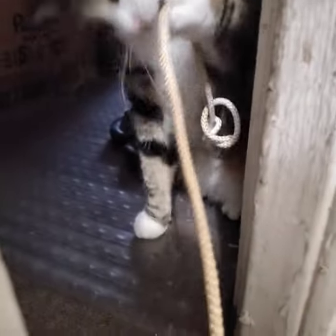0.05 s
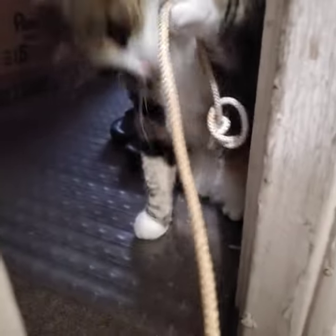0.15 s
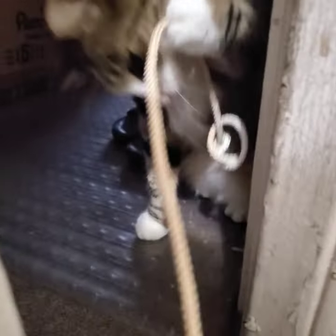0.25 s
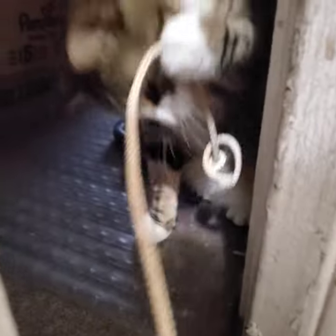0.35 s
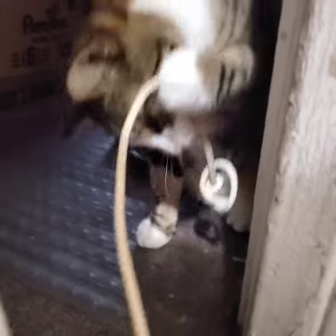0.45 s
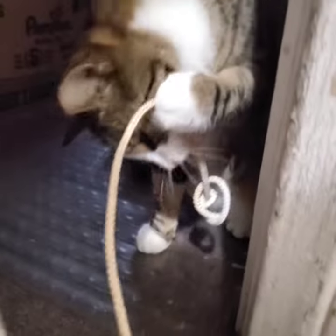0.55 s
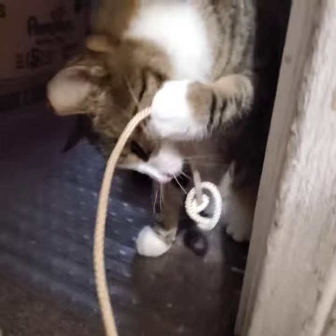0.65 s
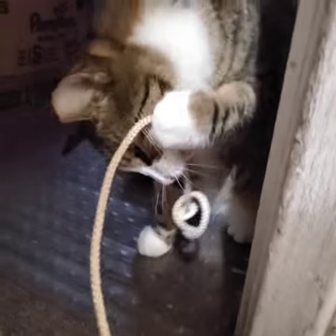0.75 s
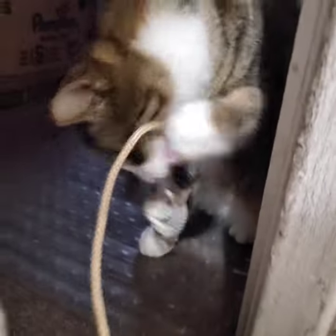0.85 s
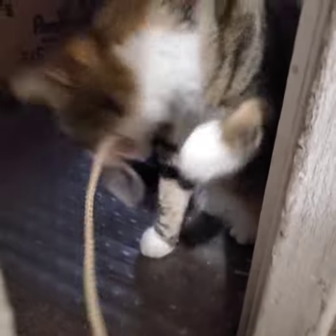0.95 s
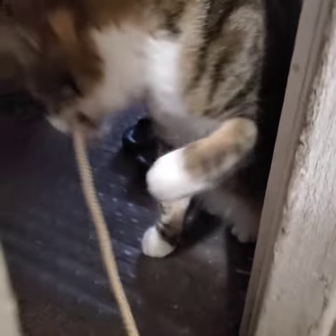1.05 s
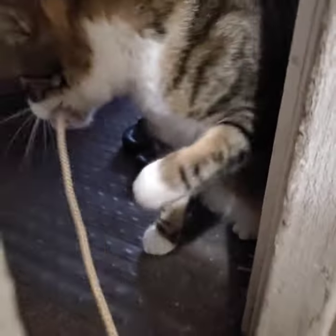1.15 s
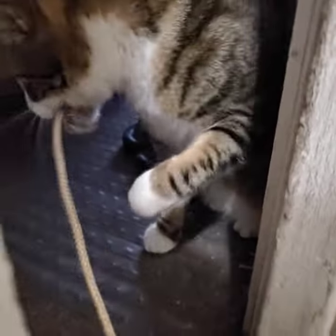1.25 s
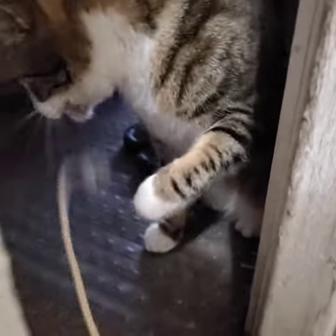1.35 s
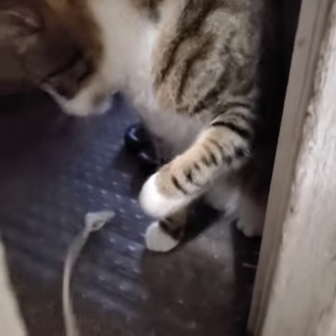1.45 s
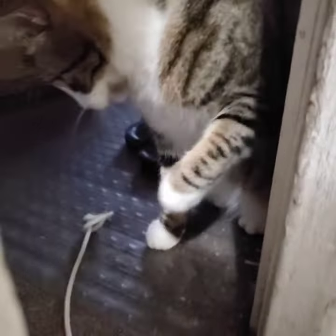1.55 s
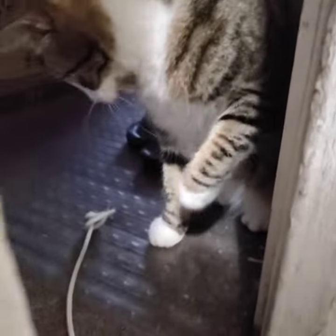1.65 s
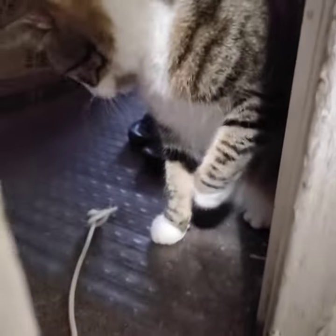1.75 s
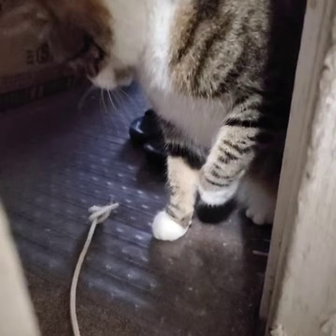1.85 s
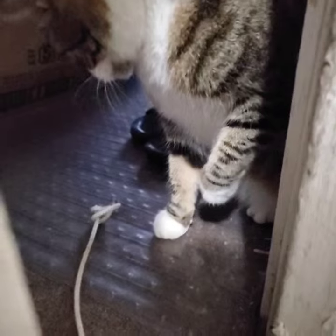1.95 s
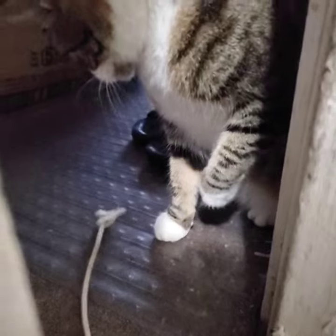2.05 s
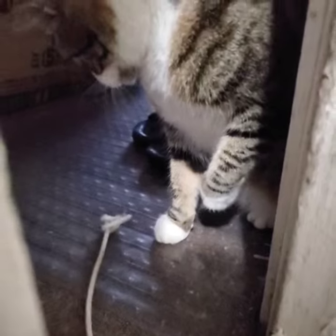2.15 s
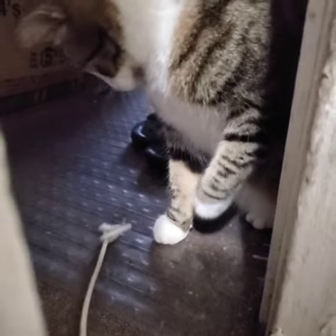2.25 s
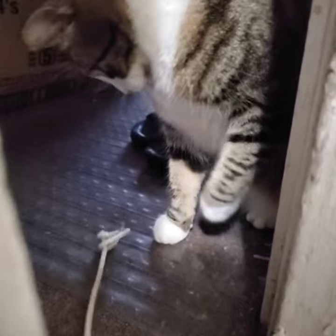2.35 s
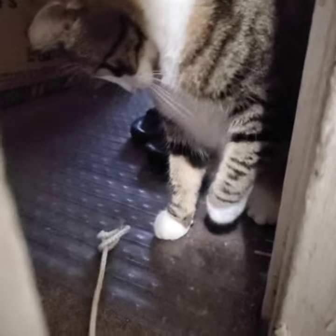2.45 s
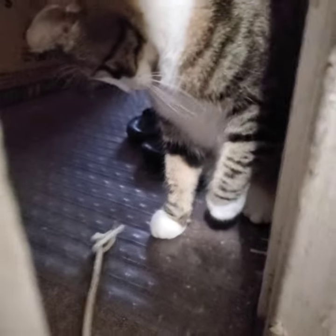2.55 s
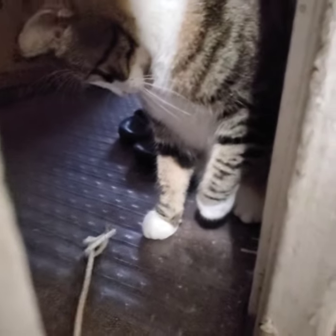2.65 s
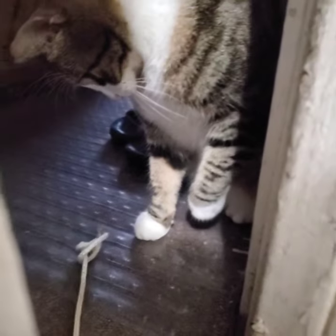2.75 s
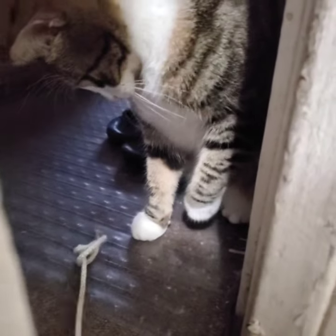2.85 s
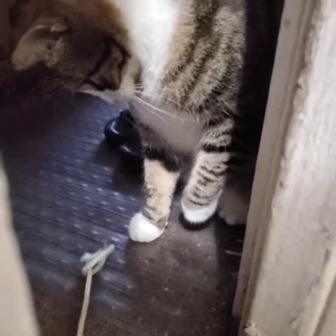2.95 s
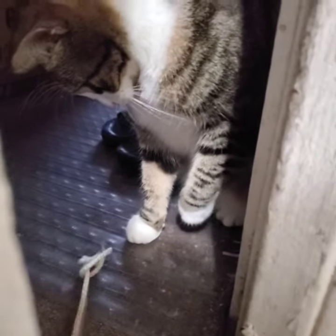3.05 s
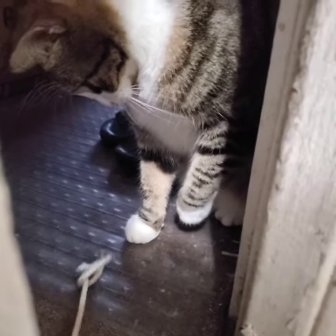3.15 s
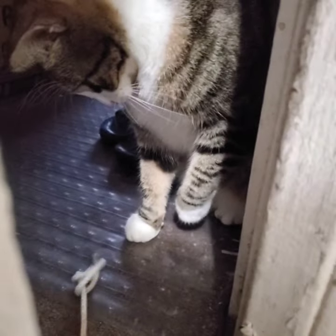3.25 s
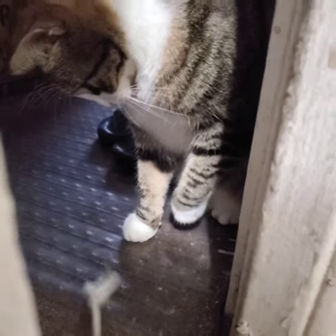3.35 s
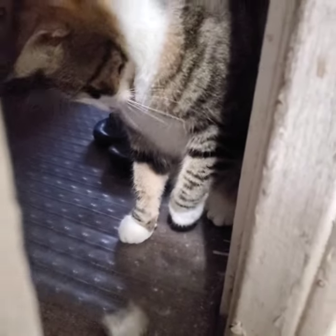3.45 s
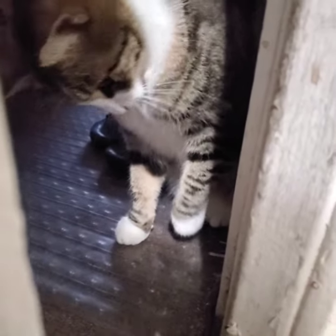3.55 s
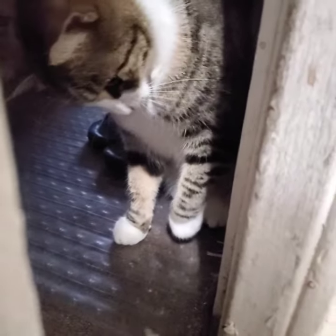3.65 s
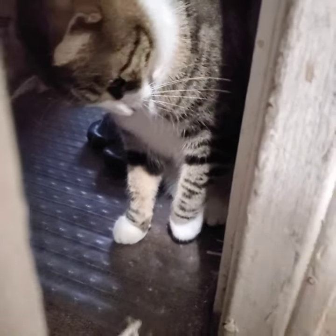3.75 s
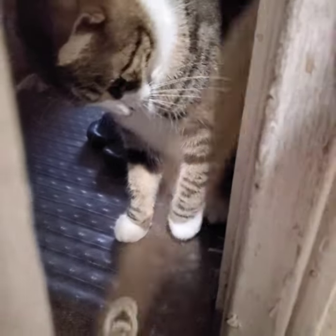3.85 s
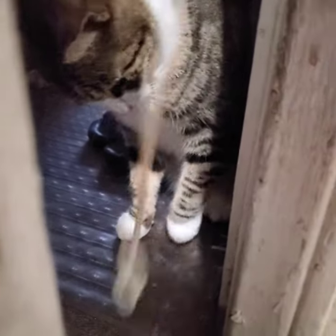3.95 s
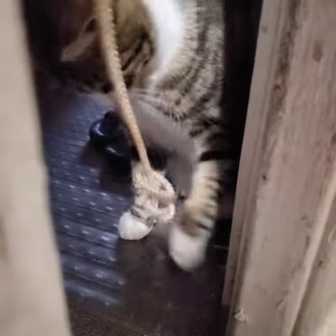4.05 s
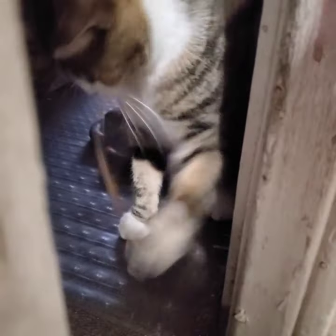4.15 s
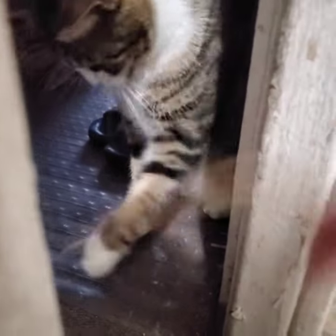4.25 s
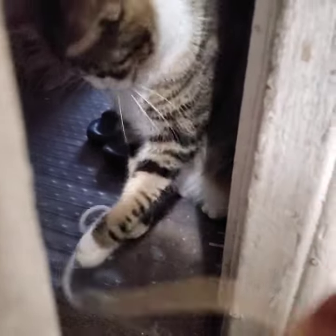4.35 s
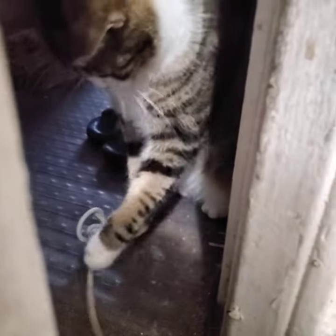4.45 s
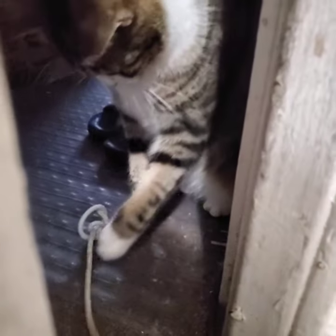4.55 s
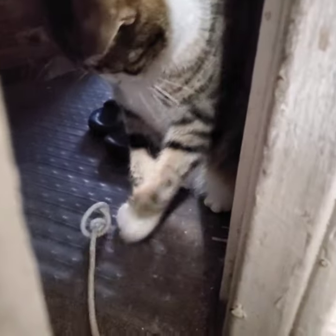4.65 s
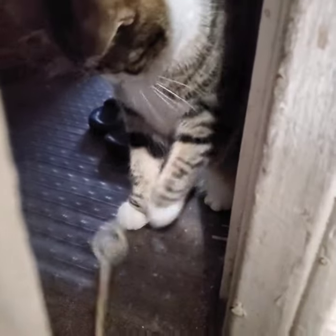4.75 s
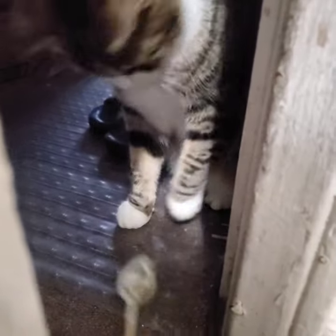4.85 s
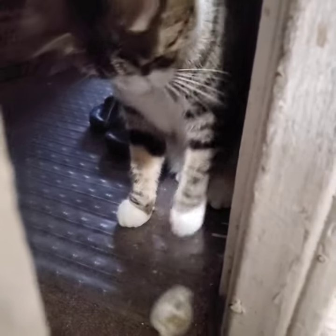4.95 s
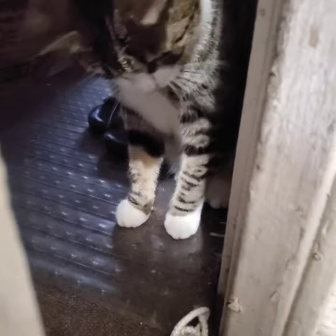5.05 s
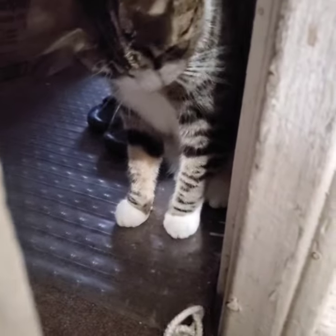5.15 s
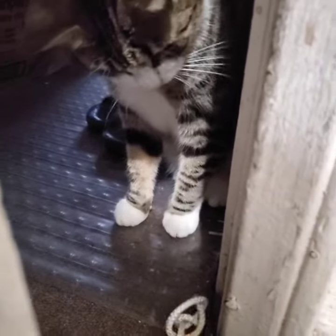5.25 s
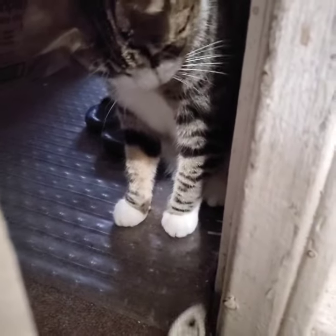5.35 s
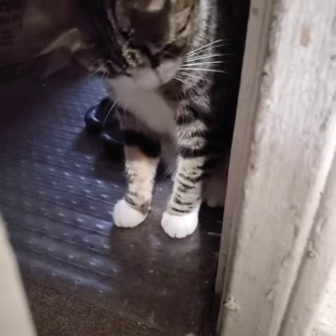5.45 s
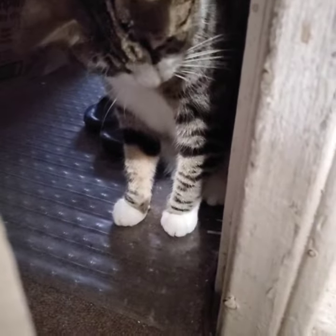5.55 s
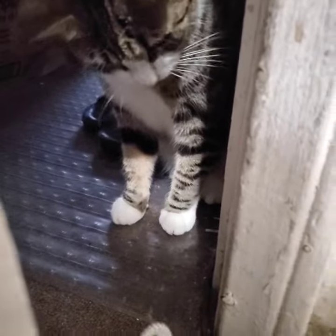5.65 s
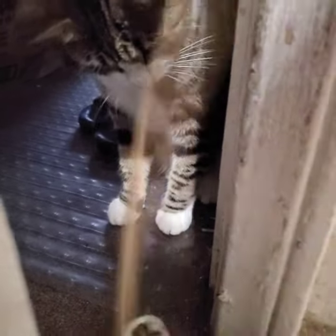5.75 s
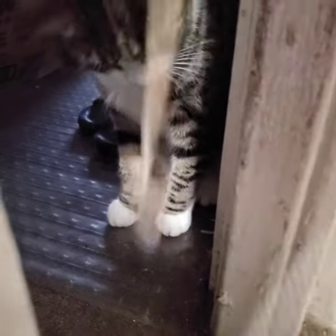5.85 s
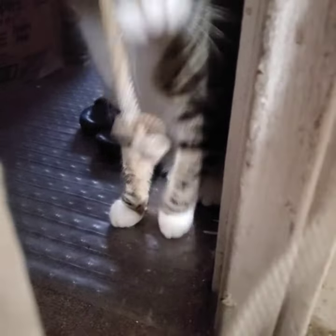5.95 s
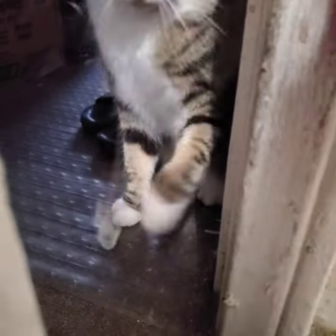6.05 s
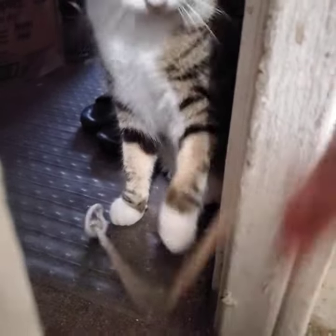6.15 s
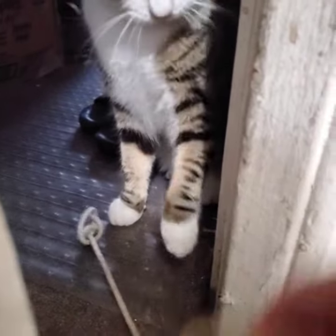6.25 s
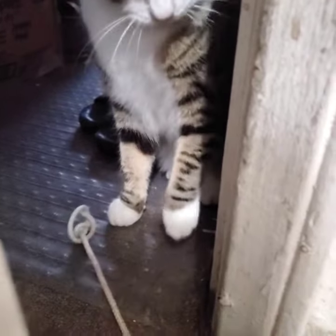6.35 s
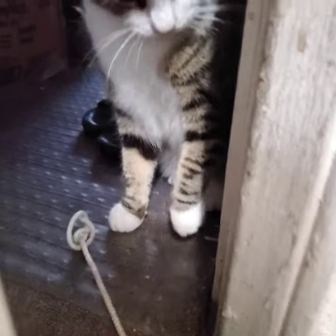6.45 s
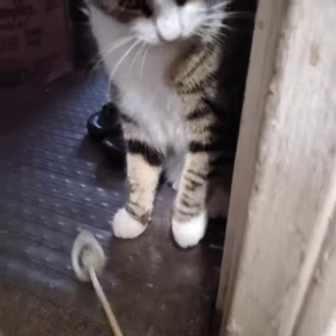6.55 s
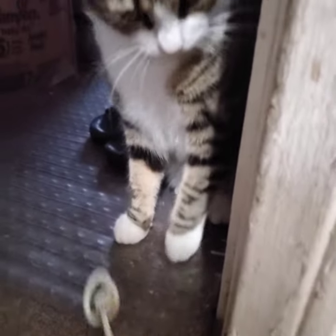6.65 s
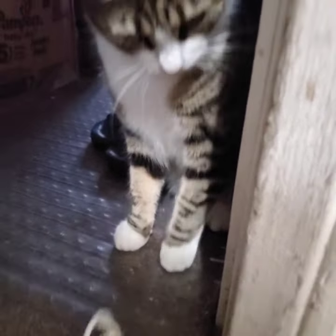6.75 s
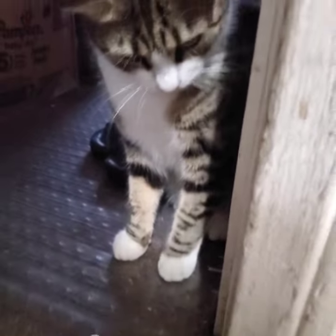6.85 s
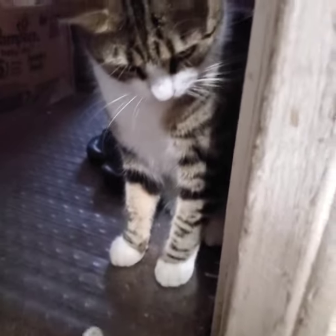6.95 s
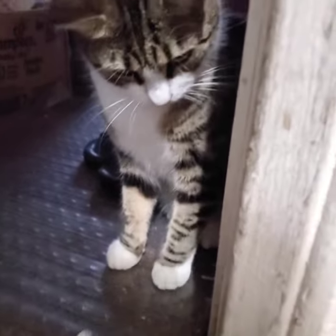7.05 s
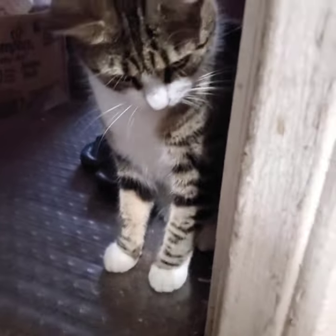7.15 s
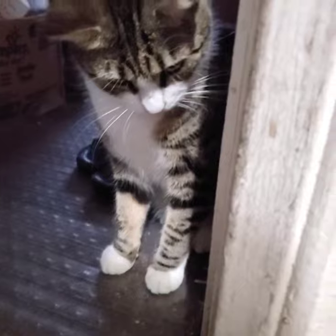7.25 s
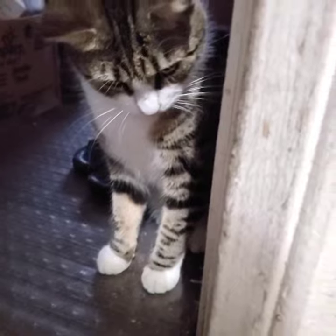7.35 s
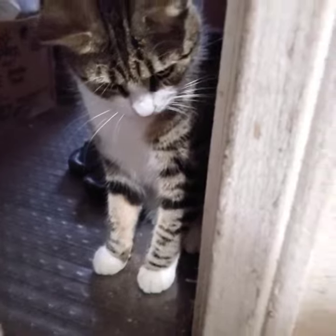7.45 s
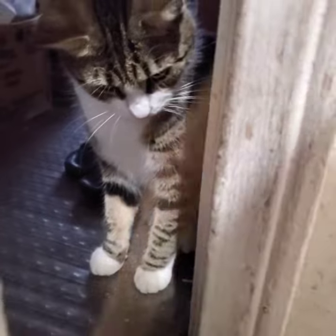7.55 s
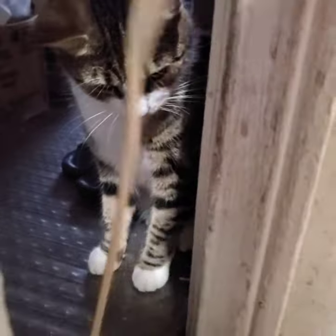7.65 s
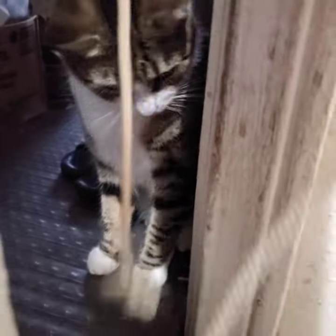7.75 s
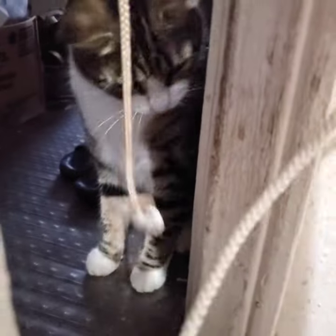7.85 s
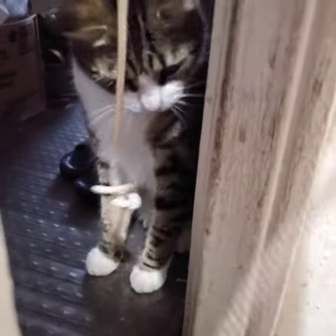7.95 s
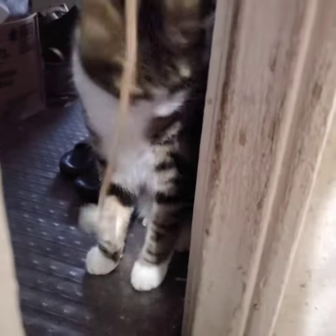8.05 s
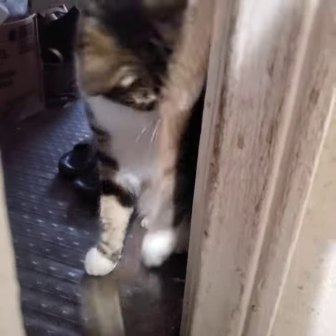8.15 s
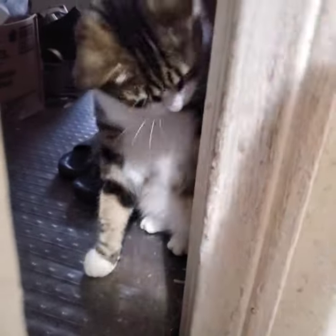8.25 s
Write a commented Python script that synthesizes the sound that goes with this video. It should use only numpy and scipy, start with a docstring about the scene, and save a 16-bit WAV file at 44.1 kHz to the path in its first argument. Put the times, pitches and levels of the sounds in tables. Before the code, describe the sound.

In a small room with a faint low rumble and hum, a cat pads softly, then a knotted cord knocks sharply on the floor. A sleeve right beside the microphone, a little to the right, starts rustling in scratchy bursts with bright little snags and a few dull bumps. The cord swishes briefly as it is swung, and two more sharp knocks land between the rustles before the cloth settles.

```python
"""A doorway in a small room, where a cat plays with a knotted cord that is swung for it.
Under everything lies a faint bed of building rumble and mains hum. There is soft brushing; paws
pad, the knot knocks and sets the floor ringing, and the cord swishes in short bands of hiss.
Right beside the microphone a sleeve rustles with countless slipping fibres, snags in bright
little sprays and now and then rubs dully or bumps the case."""
import sys
import numpy as np
from scipy import signal
from scipy.fft import rfft, irfft, next_fast_len
from scipy.io import wavfile

SR = 44100
rng = np.random.default_rng(int(sys.argv[2]) if len(sys.argv) > 2 else 0)


def transcribe(u):
    """Save the signal u as a 16-bit wav file named by the first command-line argument.

    u: samples, shape (n,) or (channels, n), limited to [-1, 1]; the rate is SR.
    q: integer samples, one column per channel.
    """
    v = np.clip(np.atleast_2d(u).T, -1, 1)
    q = np.round(v * 32767).astype(np.int16)
    wavfile.write(sys.argv[1], SR, q)


N = 365588


def from_db(db):
    """Decibels to gain."""
    return 10 ** (np.asarray(db) / 20)


def rms_one(x):
    """Scale to rms 1."""
    return x / np.sqrt(np.mean(x ** 2) + 1e-20)


def at_hz(points, hz):
    """Read a curve on a log-frequency axis."""
    known_hz, values = np.transpose(points)
    return np.interp(np.log(np.maximum(hz, 1)), np.log(known_hz), values)


def panned(pan_db):
    """Constant-power pan; pan_db is left minus right."""
    gains = from_db(np.array([[.5], [-.5]]) * pan_db)
    return gains / np.sqrt(np.mean(gains ** 2, axis=0))


def filtered(x, hz, kind, order=1):
    """Butterworth filter."""
    edges = np.clip(hz, 10, .45 * SR)
    return signal.sosfilt(signal.butter(order, edges, kind, fs=SR, output="sos"), x)


def add(out, time, sound):
    """Mix a short stereo sound in at a time in seconds."""
    start = round(time * SR)
    out[:, start:start + sound.shape[1]] += sound[:, :N - start]


def drift(rate_hz, hop=80, points=8192):
    """Smooth random modulation with an rms of about 1."""
    hz = np.fft.rfftfreq(points, hop / SR)
    slow = rms_one(irfft(rfft(rng.standard_normal(points)) / (1 + (hz / rate_hz) ** 2)))
    return np.interp(np.arange(N) / hop, np.arange(points), slow)


def stereo(sources, eq, likeness, pan=None, left_lag_s=0):
    """Spread and EQ three unrelated signals: one feeds both sides, the others one side each."""
    size = next_fast_len(N, True)
    hz = np.fft.rfftfreq(size, 1 / SR)
    parts = rfft(sources, size)
    alike = np.clip(at_hz(likeness, hz), 0, 1)
    shared = parts[0] * np.exp(-2j * np.pi * hz * np.array([[left_lag_s], [0]]))
    sides = np.sqrt(alike) * shared + np.sqrt(1 - alike) * parts[1:]
    balance = panned(at_hz(pan, hz)) if pan else 1
    return rms_one(irfft(sides * balance * from_db(at_hz(eq, hz)), size)[:, :N])


# tone of the building's rumble: (frequency [Hz], level [dB])
RUMBLE_EQ = [(20, -63), (27, -28), (36, -7.5), (58, -3), (90, -1.5), (125, -9.5), (170, -17.5),
             (250, -24.5), (520, -32), (900, -44.5), (2000, -46.5), (4000, -51), (7000, -55),
             (16000, -55.5)]
# its stereo image, mono in the lows and wide above: (frequency [Hz], left-right likeness [0-1])
RUMBLE_IMAGE = [(60, 1), (200, 0.91), (600, 0.26), (2000, .1)]
# slow swell of the bed: (time [s], level [dB])
BED_SWELL = [(0, -51.5), (1.1, -54), (2.2, -48.5), (2.7, -51), (4.5, -49.5), (5.8, -47), (6.3, -50.5),
             (8.29, -50)]


def room_tone(hum_hz=59.5, hum_db=-8.5, trim_db=-.5, pan_db=-1.0):
    """A bed of low building rumble with a mains hum inside it."""
    t = np.arange(N) / SR
    rumble = stereo(rng.standard_normal((3, N)), RUMBLE_EQ, RUMBLE_IMAGE)
    hum = from_db(hum_db) * np.sqrt(2) * np.sin(2 * np.pi * hum_hz * t)
    swell_db = np.interp(t, *np.transpose(BED_SWELL))
    return from_db(trim_db + swell_db) * (rumble + hum) * panned(pan_db)


def slips(shape, grain_db, per_s):
    """Countless fibres slip, each a tiny click of its own size."""
    accents_db = grain_db * np.minimum(rng.exponential(1, shape), 5)
    clicks = from_db(accents_db) * rng.standard_normal(shape)
    return clicks * (rng.random(shape) < per_s / SR)


# soft brushes and low handling rubs: (time [s], length [s], level [dB], centre [Hz])
BRUSH_AND_RUB_CUES = [(0.449, 0.19, -68.5, 950), (1.016, 0.071, -79, 1100), (1.126, 0.076, -75.5, 5550),
                      (1.24, 0.13, -71, 1120), (1.361, 0.098, -73.5, 1540), (3.503, 0.24, -48.5, 190),
                      (4.671, 0.16, -64, 1010), (6.078, 0.23, -57, 274), (7.171, 0.27, -55.5, 240),
                      (7.571, 0.12, -70, 994), (8.169, 0.21, -63.5, 990)]


def brushes_and_rubs(spread=1.26):
    """Grainy swells: soft shuffles and brushes, plus low, dull handling rubs as the sleeve moves."""
    out = np.zeros((2, N))
    for time, length, level_db, hz in BRUSH_AND_RUB_CUES:
        swell = np.hanning(round(length * SR))
        grains = slips((2, len(swell)), grain_db=5.0, per_s=1500)
        brush = filtered(grains, [hz / spread, hz * spread], "band", order=2)
        add(out, time, from_db(level_db) * swell * rms_one(brush))
    return out


def contacts(hits, spread=1.444, crack_db=-24, crack_t60_s=0.028, crack_hz=2000):
    """Each hit is one heavily damped thump with a brief gritty crack on top."""
    out, t = np.zeros((2, N)), np.arange(SR // 20) / SR
    crack_decay = np.exp(-np.log(1000) * t / crack_t60_s)
    for time, level_db, hz, high_cut_hz, pan_db in hits:
        thump = filtered(-signal.unit_impulse(len(t)), [hz / spread, hz * spread], "band")
        thump /= np.abs(thump).max()
        crack = filtered(rng.standard_normal((2, len(t))), crack_hz, "high") * crack_decay
        hit = filtered(thump + from_db(crack_db) * crack, high_cut_hz, "low", order=2)
        add(out, time, from_db(level_db) * hit / np.abs(hit).max() * panned(pan_db))
    return out


# the knot or a paw lands: (time [s], level [dB], centre [Hz], high cut [Hz], pan [dB])
FLOOR_HITS = [(0.506, -54, 171, 400, -5), (0.561, -52.5, 171, 400, -3), (1.308, -56, 180, 400, -3),
              (1.5028, -13.5, 574, 6820, 3), (1.5035, -25, 1240, 2500, 15), (1.592, -40.5, 400, 1200, -1),
              (4.279, -11, 1210, 2900, 7), (4.2852, -20.5, 1280, 2500, -4), (4.288, -18.5, 1510, 3600, 4.5),
              (6.1796, -11, 1400, 2500, 3.5), (6.1815, -18, 1050, 2200, 0), (6.346, -35, 1023, 3510, 3),
              (8.044, -67, 160, 398, 0)]
# the ring of the floor: (frequency [Hz], gain [dB], decay T60 [s])
FLOOR_RING = [(189.2, -34.5, 0.14), (459, -43, 0.029), (605, -44.5, 0.016), (990, -56.5, 0.13),
              (1090, -49.5, 0.0816), (1242, -50, .09), (1530, -44, 0.024), (1800, -51, .05)]


def floor_knocks():
    """Knot and paws strike the floor and set its modes ringing."""
    hits, ring = contacts(FLOOR_HITS), 0
    for hz, gain_db, t60 in FLOOR_RING:
        radius = np.exp(-np.log(1000) / (t60 * SR))
        angle = 2 * np.pi * hz / SR
        feedback = [1, -2 * radius * np.cos(angle), radius ** 2]
        ring += from_db(gain_db) * signal.lfilter([0, np.sin(angle)], feedback, hits + 1e-18)
    return hits + ring


# the cord whips and slides: (time [s], length [s], level [dB], centre [Hz])
SWISH_CUES = [(1.508, 0.031, -54.5, 3800), (3.244, 0.033, -56.5, 1190), (3.944, 0.039, -39.5, 3080),
              (4.115, 0.025, -56, 3400), (4.299, 0.043, -45, 4070), (4.4, 0.062, -52.5, 1340),
              (4.816, 0.018, -56, 1760), (5.05, 0.029, -41, 1500), (5.859, 0.047, -41.5, 3030),
              (5.972, 0.036, -55, 2540), (6.197, 0.054, -39.5, 3780), (6.26, 0.023, -53, 3900)]


def cord_swishes(attack_s=0.0054, release_s=0.0095, spread=1.51, sheen_db=-6, pan_db=-6):
    """The cord runs over cloth or floor: a broad hiss that starts and stops with the pull."""
    out, t = np.zeros((2, N)), np.arange(SR // 5) / SR
    for time, length, level_db, hz in SWISH_CUES:
        noise = rng.standard_normal((2, len(t)))
        body = rms_one(filtered(noise, [hz / spread, hz * spread], "band", order=2))
        sheen = from_db(sheen_db) * rms_one(filtered(noise, [1.26 * hz, 2.7 * hz], "band"))
        pull = np.minimum(t / attack_s, 1) * np.exp(-np.maximum(t - length, 0) / release_s)
        add(out, time, from_db(level_db) * pull * (body + sheen) * panned(pan_db))
    return out


# the cloth catches hard and lets go: (time [s], level before trim [dB], length [s])
SNAG_CUES = [(1.559, -48, .004), (2.079, -51, .006), (2.418, -34, .015), (2.899, -42, .0045),
             (3.092, -41, .004), (3.311, -26.5, 0.021), (3.388, -29.5, 0.0025), (3.456, -18, 0.0033),
             (3.519, -21, 0.0021), (3.623, -20.5, 0.0044), (3.657, -25, 0.011), (3.883, -43, 0.0028),
             (5.111, -27, 0.015), (5.143, -21.5, 0.007), (5.239, -35.5, 0.0046), (5.911, -24, 0.0054),
             (6.054, -33.5, 0.0058), (7.197, -28.5, 0.0019), (7.321, -27.5, 0.004), (7.82, -46, 0.0037)]


def cloth_snags(sleeve_db, small_per_s=5, small_lift_db=11.5, small_s=.003, trim_db=-5, pan_db=-8):
    """A caught fold lets go in a bright spray; small chance snags ride the sleeve's level."""
    out, t = np.zeros((2, N)), np.arange(SR // 10) / SR
    catches = np.flatnonzero(rng.random(N) < small_per_s / SR)
    small_snags = [(i / SR, sleeve_db[i] + small_lift_db, small_s) for i in catches]
    for time, level_db, length in SNAG_CUES + small_snags:
        spray = filtered(rng.standard_normal((2, len(t))), hz=3200, kind="high")
        attack_s = length / 4
        envelope = t / attack_s * np.exp(1 - t / attack_s)
        add(out, time, from_db(level_db + trim_db) * envelope * spray * panned(pan_db))
    return out


# the sleeve's light creep between strokes: (time [s], level [dB])
CREEP_LEVELS = [(1.9, -82), (2.15, -66), (3.7, -69.5), (3.9, -77.5), (4.42, -66), (4.6, -85.5),
                (5.2, -62.5), (5.82, -74.5), (6.35, -71), (6.58, -76), (7.4, -65), (7.6, -93)]
# strokes of the sleeve:
# (time [s], length [s], level [dB], attack [share of length], crispness [dB], focus [Hz])
STROKE_CUES = [ (2.011, 0.052, -67, .5, -7, 2900), (2.124, 0.1, -58, 0.32, -8, 2870),
               (2.25, 0.24, -47.5, 0.59, -4, 3000), (2.508, 0.21, -50, 0.24, -6.5, 4100),
               (2.725, .17, -60, 0.57, 0, 4200), (2.952, 0.11, -59, 0.22, -6.5, 2930),
               (3.087, 0.068, -48.5, 0.56, -7, 4150), (3.175, 0.23, -56.5, .45, -3, 5630),
               (3.417, 0.26, -41.5, .64, 2.5, 5350), (3.636, 0.046, -39, 0.54, 5.5, 5400),
               (3.721, 0.096, -54, 0.63, -9, 3530), (4.035, 0.051, -54, .5, -6, 3150),
               (4.166, .14, -56.5, 0.41, -3.5, 3800), (4.253, .14, -42.5, 0.31, -6.5, 4000),
               (4.856, .06, -43.5, 0.44, -13, 4800), (4.86, 0.31, -40, 0.39, -4.5, 4560),
               (5.254, 0.081, -50.5, 0.57, -0.5, 5170), (5.319, 0.31, -49.5, 0.75, 2.5, 3530),
               (5.667, 0.12, -52, 0.38, -3.5, 4470), (5.969, 0.039, -56, .4, -8, 4150),
               (6.056, 0.22, -45.5, 0.56, -6, 4100), (6.411, 0.063, -63.5, 0.17, 0.5, 5800),
               (6.627, 0.04, -52, 0.41, -5.5, 3700), (6.662, 0.26, -40, 0.25, -6, 4000),
               (6.9, 0.16, -58.5, .4, -8, 3850), (7.001, 0.069, -49, 0.6, -4.5, 4230),
               (7.067, .035, -48.5, 0.54, -4, 3900), (7.101, 0.091, -59.5, 0.66, -1, 3900),
               (7.188, 0.12, -49, 0.44, -1.5, 5800), (7.245, .15, -48.5, 0.41, -1, 4900),
               (7.741, 0.037, -58, 0.4, -9.5, 3800), (7.753, 0.2, -70.5, .5, -8, 3070)]


def sleeve_motion(creep_crisp_db=-2.5, creep_focus_hz=3500, edge_drop_db=12.5, flatness=2.28):
    """Level, crispness and focus curves of the cloth: strokes swell and fade over a light creep."""
    t = np.arange(N) / SR
    creeping = (t > CREEP_LEVELS[0][0]) & (t < CREEP_LEVELS[-1][0])
    power = from_db(np.interp(t, *np.transpose(CREEP_LEVELS))) ** 2 * creeping + 1e-14
    # crispness and focus are averaged by power, so the loudest stroke sets the tone
    treble, focus = power * from_db(creep_crisp_db) ** 2, power * creep_focus_hz
    for time, length, level_db, attack, crisp_db, focus_hz in STROKE_CUES:
        span = np.abs(t - time - length / 2) < length
        progress = (t[span] - time) / length
        from_crest = np.maximum(1 - progress / attack, (progress - attack) / (1 - attack))
        stroke_power = from_db(level_db - edge_drop_db * np.abs(from_crest) ** flatness) ** 2
        power[span] += stroke_power
        treble[span] += stroke_power * from_db(crisp_db) ** 2
        focus[span] += stroke_power * focus_hz
    return 10 * np.log10(power), 10 * np.log10(treble / power), focus / power


def folds(cloth, focus_hz, boost_db=4.5, width_octaves=0.4, shift_db=2.5, bands=16):
    """A moving EQ: each stroke favours its focus, and shifting folds lift one band, then another."""
    size, out = next_fast_len(N, True), 0
    hz, spectrum = np.fft.rfftfreq(size, 1 / SR), rfft(cloth, size)
    centres = np.geomspace(600, 14000, bands)
    band_position = np.interp(hz, centres, np.arange(bands))
    for k, centre in enumerate(centres):
        band = irfft(spectrum * np.maximum(1 - np.abs(band_position - k), 0), size)[:, :N]
        nearness = np.exp(-(np.log2(centre / focus_hz) / width_octaves) ** 2)
        out += band * from_db(boost_db * nearness + shift_db * drift(rate_hz=9))
    return out


# stereo image of the cloth, widest at the top: (frequency [Hz], left-right likeness [0-1])
SLEEVE_IMAGE = [(200, 0.53), (1400, 0.54), (3000, 0.44), (7000, 0), (15000, 0)]
# the sleeve sits to the right: (frequency [Hz], pan [dB])
SLEEVE_PAN = [(200, -4), (1200, -3.5), (2400, -2.5), (4400, -7), (15000, -9)]


def friction(eq, grain_db, slips_per_s):
    """One layer of slipping fibres, heard from the right."""
    grains = slips((3, N), grain_db, slips_per_s)
    return stereo(grains, eq, SLEEVE_IMAGE, SLEEVE_PAN, left_lag_s=0.00039)


# low, middle and top layers of the cloth: (frequency [Hz], level [dB])
RUB_EQ = [(25, -32.5), (90, 11), (200, 2.5), (450, -1.5), (700, -2.5), (1000, -1), (1400, 0), (1900, -5),
          (2600, -17), (5000, -45)]
RUSTLE_EQ = [(900, -30.5), (1700, -6.5), (2300, 1.5), (2900, 3.5), (3900, 2.5), (5000, -1.5), (6500, 3.5),
             (7500, 0), (8600, -22.5), (12000, -28.5)]
CRISP_EQ = [(4000, -24.5), (7000, -6.5), (8200, -4.5), (9500, -5), (11500, 2), (13500, 0), (16000, -3),
            (18000, -15)]


def sleeve_rustle(level_db, crisp_db, focus_hz, ordinary_db=-49.5, flutter_db=1.56, waver_db=0.75):
    """Sliding cloth rustles: light strokes carry more low rub, crisp ones more crackle."""
    rub_db = -2.5 - 0.1524 * (level_db - ordinary_db)
    rub = from_db(rub_db) * friction(RUB_EQ, grain_db=2.0, slips_per_s=2200)
    rustle = from_db(0.5) * friction(RUSTLE_EQ, grain_db=2.0, slips_per_s=14000)
    crackle = from_db(crisp_db + 3.0) * friction(CRISP_EQ, grain_db=2.5, slips_per_s=13000)
    unsteady_db = flutter_db * drift(rate_hz=60) + waver_db * drift(rate_hz=16)
    return from_db(level_db + unsteady_db) * folds(rub + rustle + crackle, focus_hz)


# bumps on the case: (time [s], level [dB], centre [Hz], high cut [Hz], pan [dB])
CASE_HITS = [(2.597, -40, 520, 1500, -7), (2.607, -33, 620, 2000, -19), (2.836, -35.5, 290, 880, -27),
             (3.4575, -24, 437, 700, -6), (3.4598, -32.5, 473, 683, -4.5), (4.849, -30.5, 1350, 3000, 4),
             (4.856, -38, 500, 1200, -3), (4.916, -28.5, 2000, 4000, 0)]


def sleeve_bumps():
    """The sleeve bumps the microphone case: short, dead thumps."""
    return contacts(CASE_HITS)


def room_reverb(send, t60_s=0.24, first_echo_s=0.0058, wall_cut_hz=11000):
    """Dense, dulled reflections that swell until the first wall echo and then die away."""
    t = np.arange(SR // 2) / SR
    envelope = np.minimum(t / first_echo_s, 1) ** 2 * np.exp(-np.log(1000) * t / t60_s)
    echoes = filtered(rng.standard_normal((2, len(t))) * envelope, wall_cut_hz, "low")
    echoes /= np.sqrt(np.sum(echoes ** 2, axis=1, keepdims=True))
    return signal.fftconvolve(send, echoes, axes=1)[:, :N]


def scene():
    """Sleeve and cord are close and nearly dry; knocks, brushes and rubs get more of the room."""
    level_db, crisp_db, focus_hz = sleeve_motion()
    bed = room_tone()
    roomy = floor_knocks() + brushes_and_rubs()
    close = sleeve_rustle(level_db, crisp_db, focus_hz) + sleeve_bumps()
    close += cord_swishes() + cloth_snags(level_db)
    send = from_db(-20.0) * close + from_db(-12.5) * roomy
    return close + roomy + room_reverb(send) + bed


def record(dry):
    """A steep high cut at 16 kHz on the whole mix."""
    return signal.sosfilt(signal.ellip(12, .1, 80, 16000, fs=SR, output="sos"), dry)


dry = scene()
out = record(dry)
transcribe(out)
```